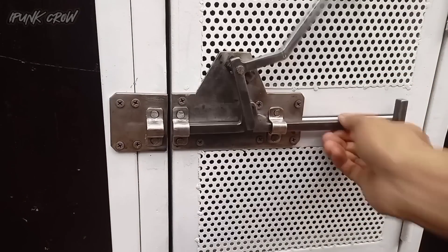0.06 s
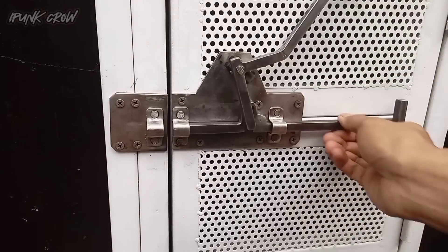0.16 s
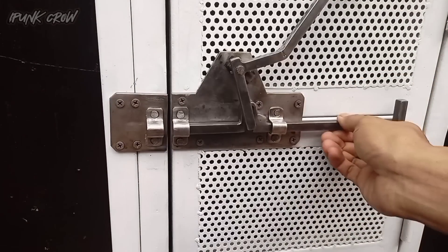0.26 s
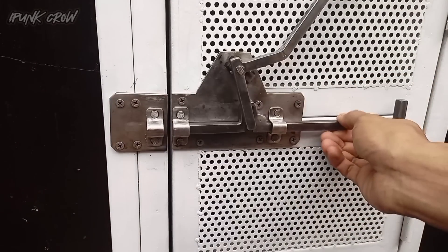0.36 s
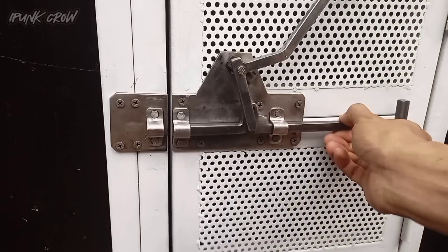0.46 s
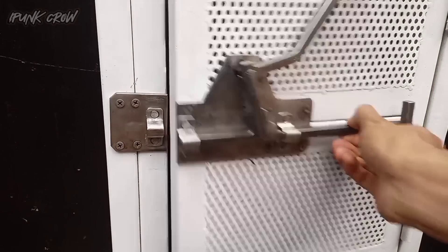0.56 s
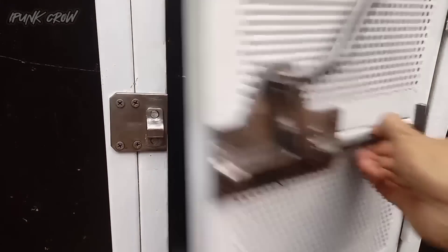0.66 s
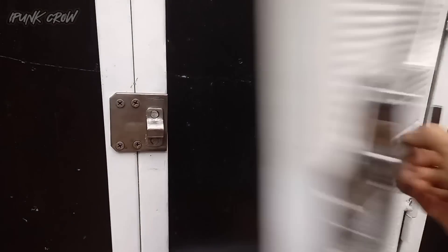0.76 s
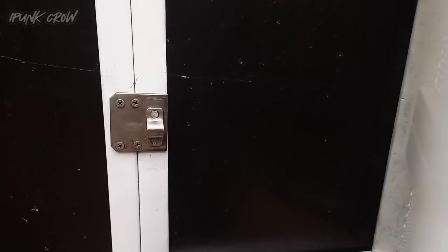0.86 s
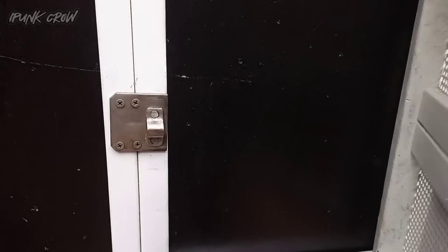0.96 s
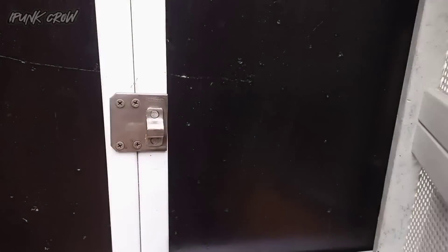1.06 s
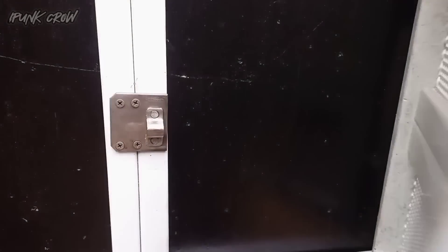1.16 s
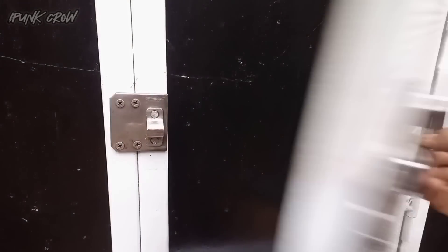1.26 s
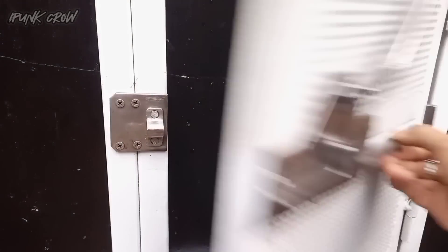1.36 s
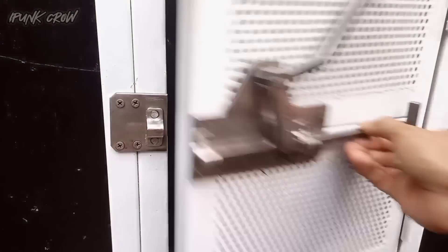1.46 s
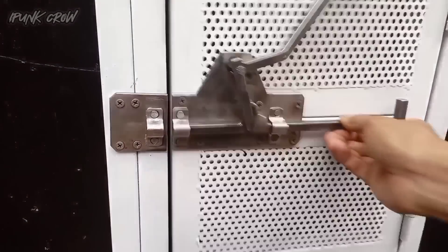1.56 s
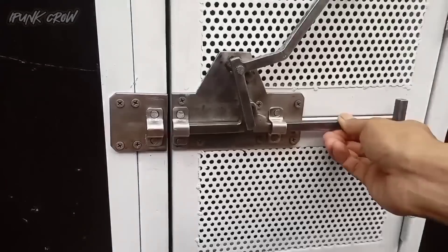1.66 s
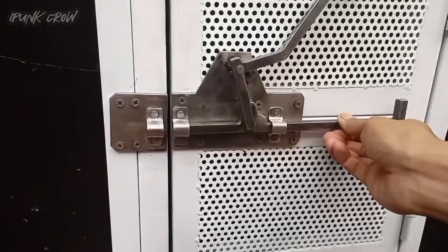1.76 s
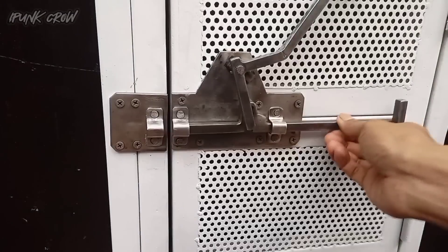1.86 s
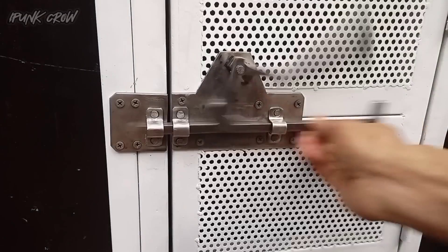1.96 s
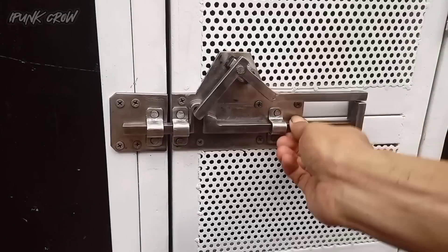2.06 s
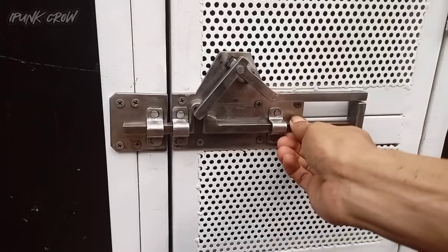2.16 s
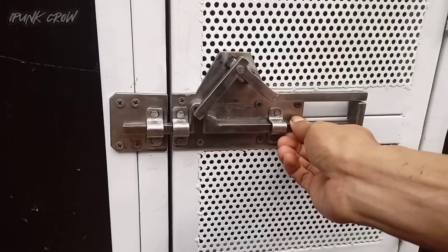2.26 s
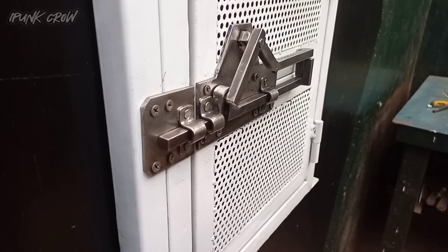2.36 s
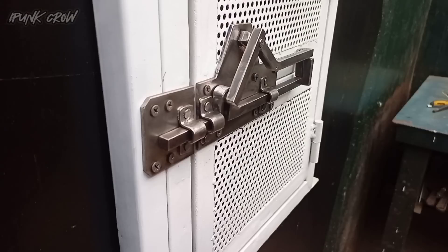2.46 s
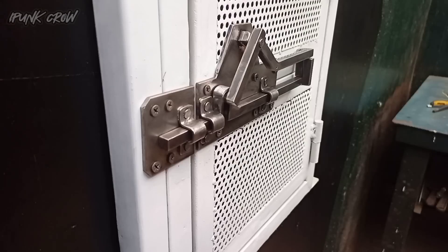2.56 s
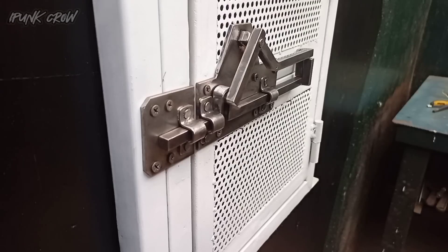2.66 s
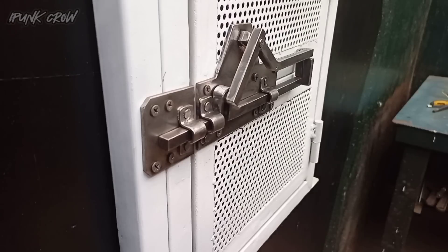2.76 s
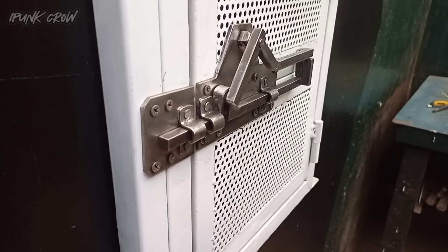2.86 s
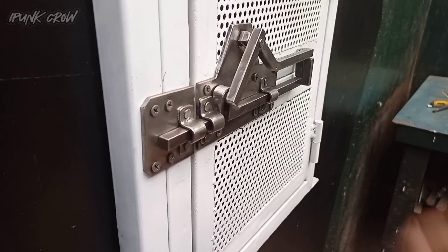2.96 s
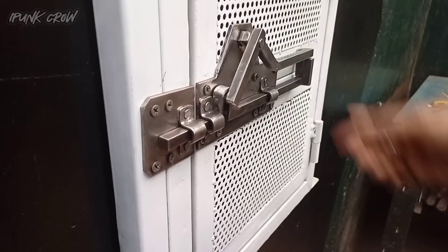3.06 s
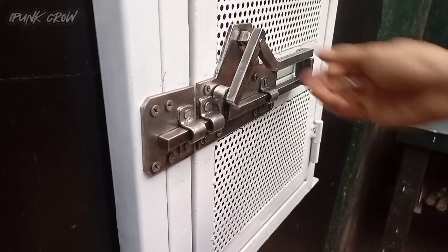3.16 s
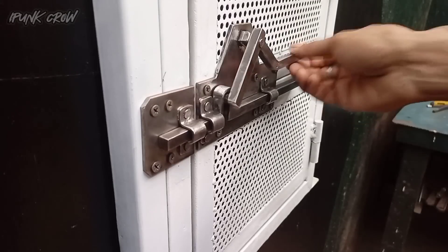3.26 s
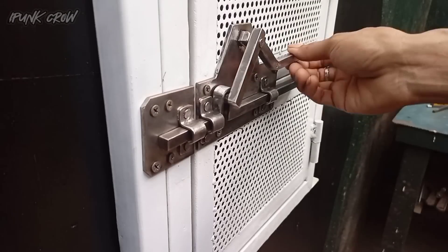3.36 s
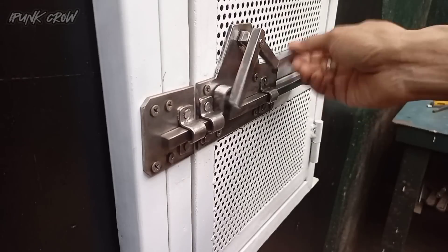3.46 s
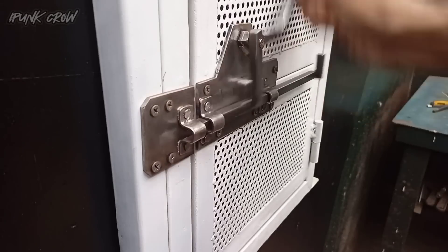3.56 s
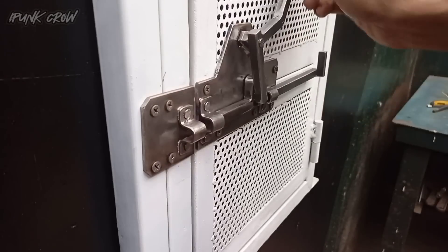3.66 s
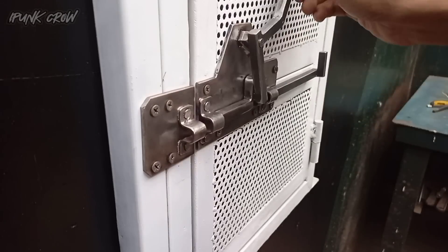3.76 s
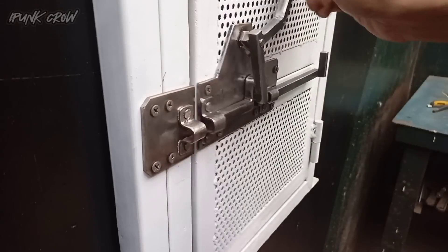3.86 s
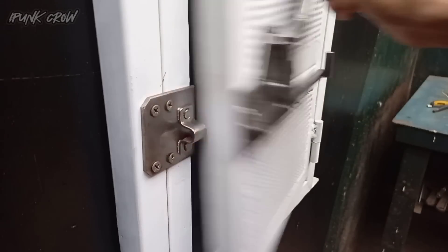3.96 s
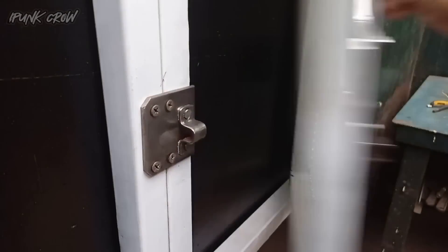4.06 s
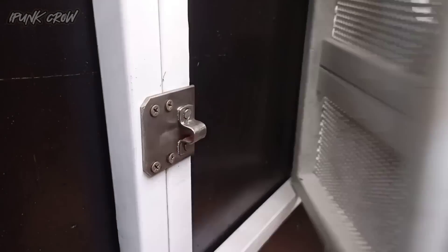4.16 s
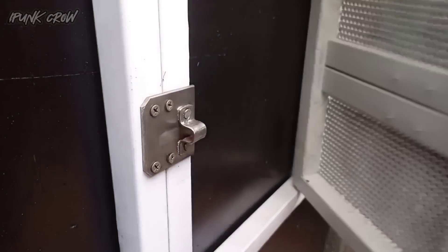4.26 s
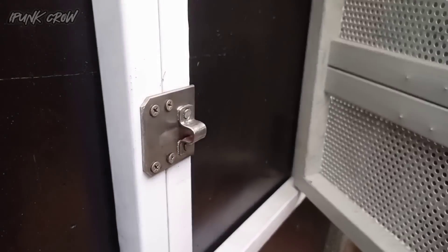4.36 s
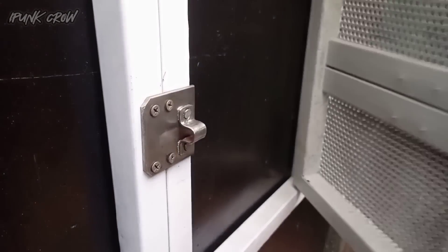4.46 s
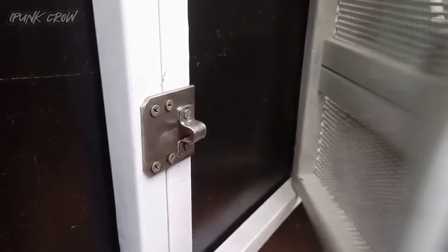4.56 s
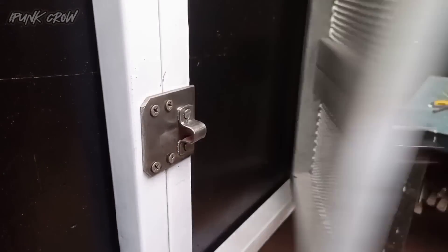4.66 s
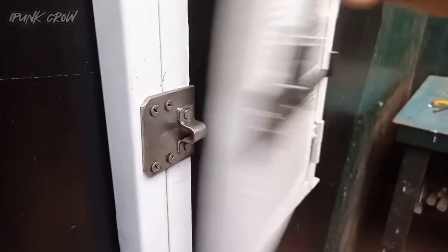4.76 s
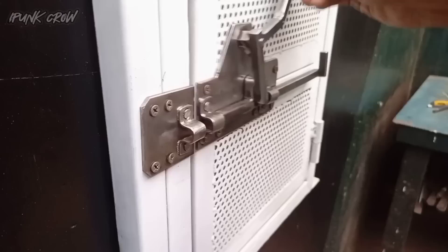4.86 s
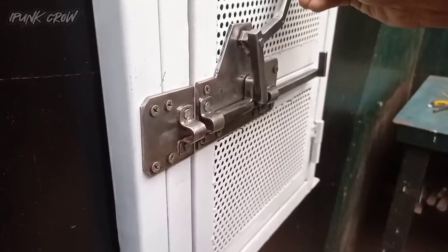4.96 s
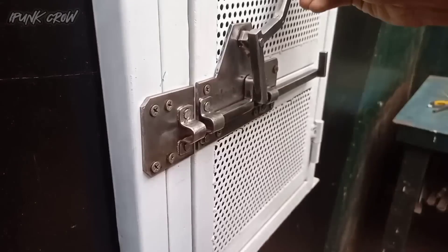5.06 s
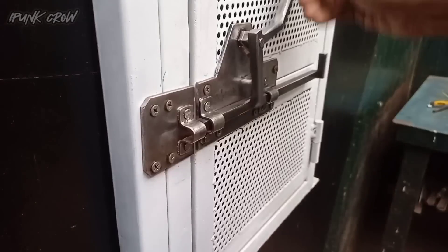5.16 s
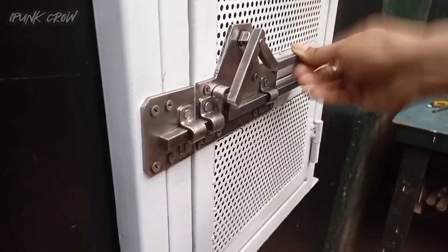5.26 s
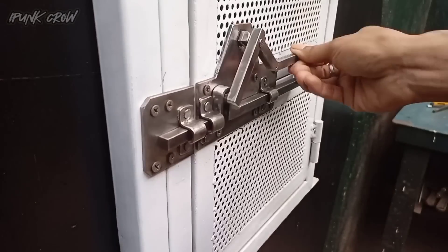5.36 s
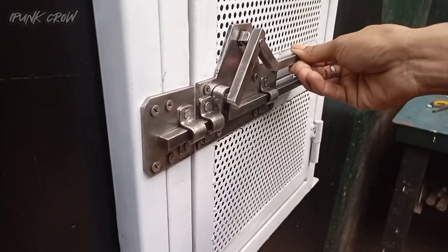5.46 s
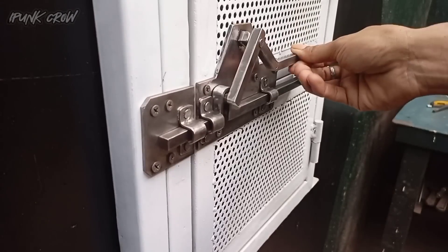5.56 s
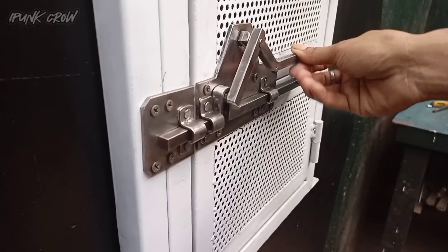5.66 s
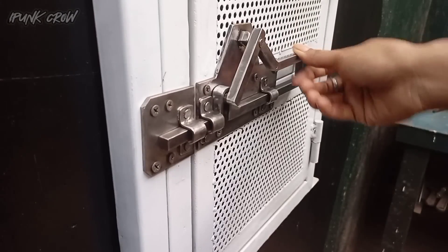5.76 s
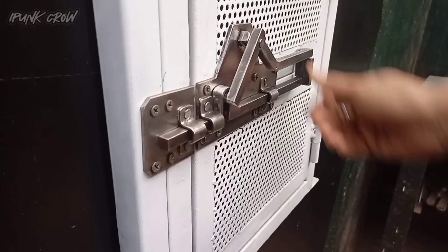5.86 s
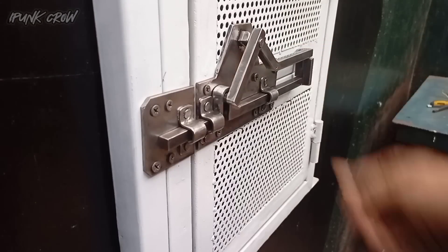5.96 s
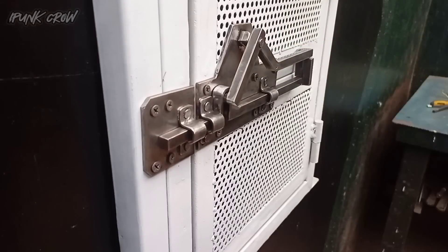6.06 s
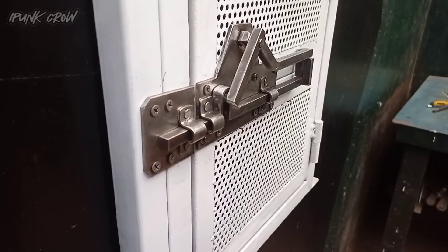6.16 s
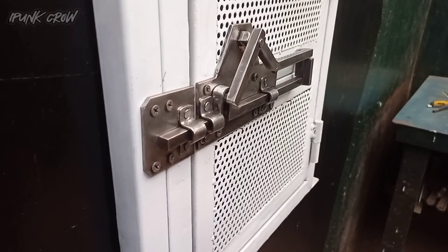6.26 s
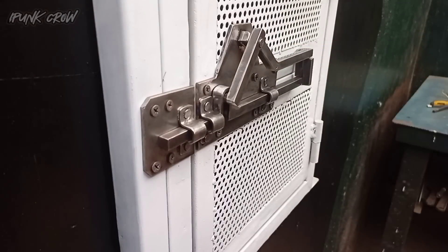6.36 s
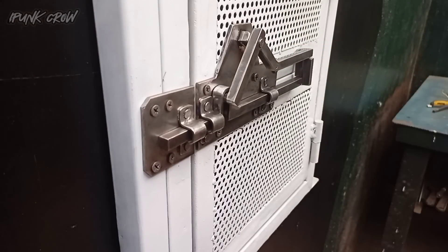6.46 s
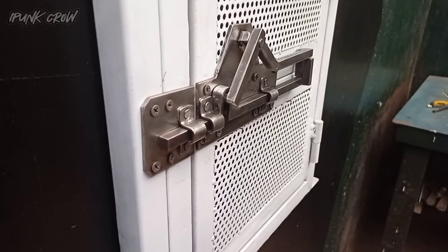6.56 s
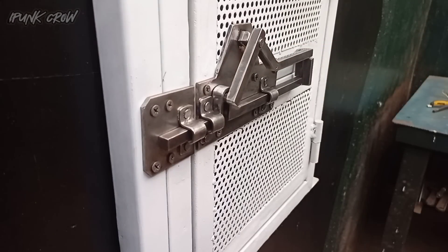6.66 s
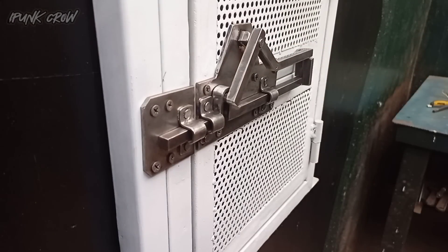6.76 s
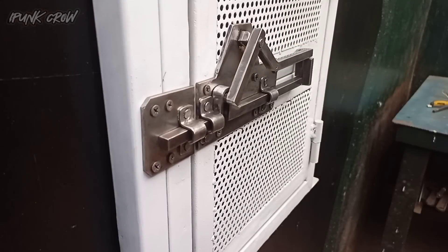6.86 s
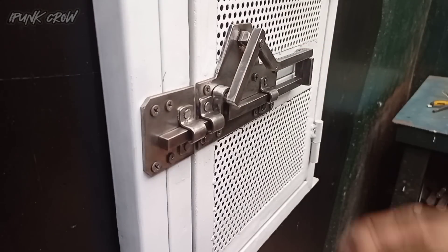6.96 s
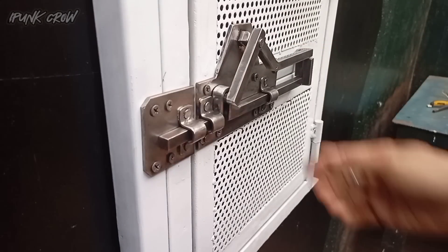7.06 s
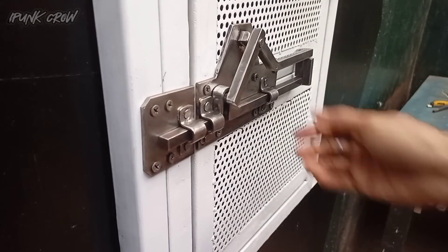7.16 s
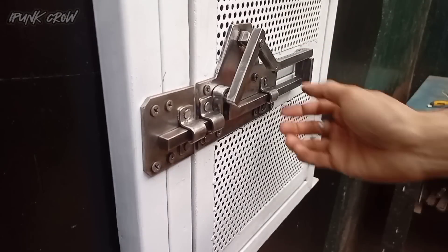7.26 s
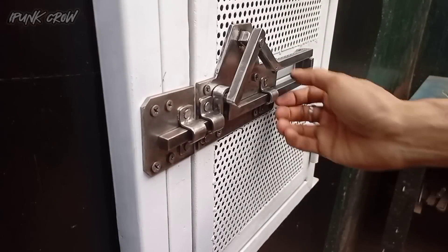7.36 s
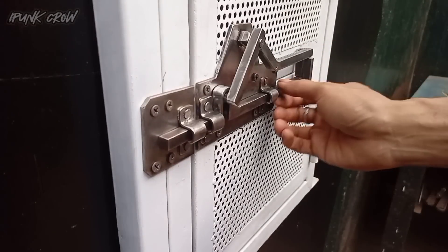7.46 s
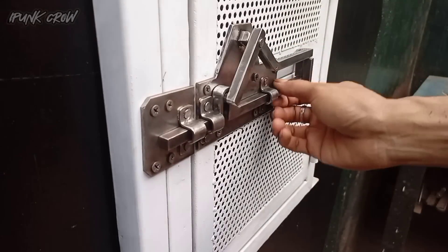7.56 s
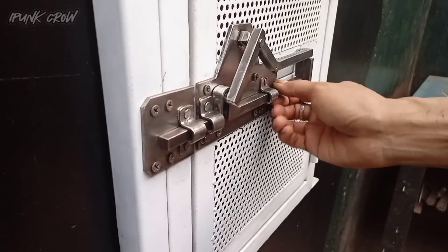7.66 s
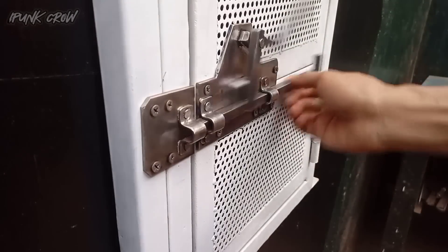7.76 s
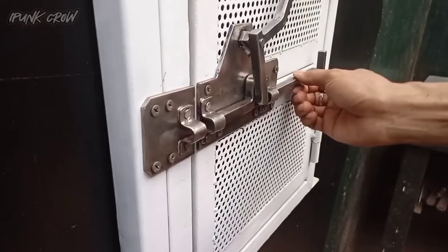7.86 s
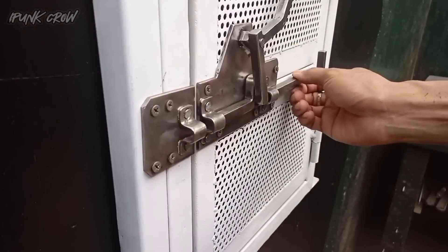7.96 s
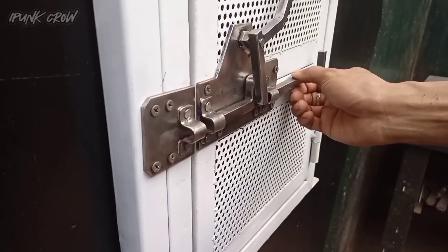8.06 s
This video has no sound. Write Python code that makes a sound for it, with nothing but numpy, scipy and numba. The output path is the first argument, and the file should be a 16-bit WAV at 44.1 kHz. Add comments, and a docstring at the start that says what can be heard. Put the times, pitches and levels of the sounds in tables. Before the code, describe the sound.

A steel lever bolt clacks, scrapes and bangs five times on a sheet-metal door that shuts twice, over a faint hum.

```python
"""In a small hard room, a hand works a steel lever bolt on a perforated sheet-metal door, five throws in all.
Each throw is a clack of loose links, a stick-slip scrape and a bang on the end stop; the impacts excite
the modes of latch and sheet. Twice the door meets its frame, and its hinges knock and chirp as it swings.
A faint hum lies underneath. A limiter ducks on the bangs, so that the room swells after them."""
import sys
import numpy as np
from scipy import signal
from scipy.fft import rfft, irfft
from scipy.io import wavfile
from numba import njit

SR = 44100
rng = np.random.default_rng(int(sys.argv[2]) if len(sys.argv) > 2 else 0)


def materialize(psi):
    """Save the field psi as 16-bit PCM at rate SR to the path in sys.argv[1].

    A 1-D psi becomes a single channel; in a 2-D psi each row is a channel.
    """
    bounded = np.clip(np.atleast_2d(psi).T, -1, 1)
    quanta = np.round(bounded * 32767).astype(np.int16)
    wavfile.write(sys.argv[1], SR, quanta)


N = 357210
T = np.arange(N) / SR
RING_T = T[:SR]  # one second for a blow to die away

# steady machine tones: (frequency [Hz], level [dB])
HUM_TONES = [(102.3, -88), (339.1, -76.5), (393.0, -71), (452.2, -76.5), (877.5, -83.5), (952.8, -78.5),
             (1017, -80), (1513, -73), (1637, -85.5), (1793, -81.5)]
# spectra of the background noises: (frequency [Hz], relative spectral level [dB])
AIR_SPECTRUM = [(25, -31.5), (100, -9.5), (190, -5), (260, -3.5), (400, 3), (560, -5.5), (930, 2),
                (1380, -17), (1540, 3), (1800, -7), (2400, -31.5), (7500, -50)]
HISS_SPECTRUM = [(1500, -22.5), (2200, -2.5), (2500, -8.5), (3100, 1), (4300, 2.5), (5200, -6), (6500, -7),
                 (8000, -18)]
RUMBLE_SPECTRUM = [(25, -29), (60, 5.5), (115, -1.5), (200, -13), (600, -44.5)]
# swells of the hiss and of the rumble: (centre [s], half width [s], level [dB])
HISS_SWELLS = [(4.95, 0.17, -73), (6.08, 0.13, -77), (6.88, 0.058, -75.5)]
RUMBLE_SWELLS = [(0.65, 0.27, -64), (1.35, 0.2, -63.5), (2.1, 0.34, -64), (6.4, 0.16, -68),
                 (7.45, 0.46, -71.5)]
# spectra of wall echoes, steel impact, friction, door boom: (frequency [Hz], relative spectral level [dB])
WALL_SPECTRUM = [(60, -2), (300, 5), (800, -7), (1600, -2), (3000, -1.5), (4500, 0.5), (6500, 0), (8400, 1)]
STEEL_SPECTRUM = [(60, -38), (200, -25), (400, -20), (700, -9.5), (1200, -9), (1700, -2.5), (2300, -0.5),
                  (3500, -2), (4800, -3), (6700, -0.5), (7600, -6.5), (8400, -13)]
SCRAPE_SPECTRUM = [(60, -33.5), (300, -28), (1000, -14.5), (1700, 3), (2200, 0), (3500, 3), (4800, -9.5),
                   (6700, -8), (8400, -21.5)]
BOOM_SPECTRUM = [(30, -31), (70, -16), (150, 2.5), (400, -1), (800, -1), (1500, -10), (4000, -31.5)]
# modes of the latch's lever, guides and plate: (frequency [Hz], relative level [dB])
LATCH_RING = [(1141, -6.5), (1636, -7.5), (1754, -7.5), (1868, 4.5), (1954, -2), (2045, -3.5), (2126, 1.5),
              (2217, 2), (2314, -1.5), (2535, -8.5), (2777, -1.5), (3025, -3), (3294, -5.5), (3429, 0),
              (3590, -2), (3800, -6), (3892, -5.5), (3983, -3), (4242, -3.5), (4441, -3), (4635, -7.5),
              (5431, -5), (5544, -6.5), (5883, -13), (5996, -6.5), (6115, -5.5), (6212, -1), (6508, -2),
              (6669, -5.5), (6896, -10)]
# modes of the bolt, damped by the hand: (frequency [Hz], relative level [dB])
BOLT_RING = [(1960, -2), (2150, -2), (2830, -5), (3235, 1), (3440, -2), (3650, 1.5), (3914, -3.5),
             (4250, -8.5)]
# modes of the sheet-metal door: (frequency [Hz], relative level [dB])
PANEL_RING = [(78, -12.5), (112, -17.5), (135, -10), (161, -4.5), (186, -3.5), (228, -1), (268, -6),
              (310, 4), (345, -0.5), (395, 3.5), (432, 4.5), (492, -10.5), (565, -5.5)]
# damped low tones of the thump that comes with each bang: (frequency [Hz], relative level [dB])
THUMP_TONES = [(75, -8), (135, 3), (215, -3), (340, -1.5), (490, 5.5), (660, 6.5), (880, 0)]
# slips of the hinge as the door starts to swing: (time [s], level [dB], pitch [Hz])
HINGE_SLIPS = [(4.046, -29, 2244), (4.063, -36.5, 2250), (4.111, -35.5, 2230)]
# knocks of the swinging door on its hinges: (time [s], level [dB], treble [dB], body [dB])
HINGE_HITS = [(0.9954, -25, -6, 5), (1.4607, -51, -17.5, 9.5), (4.128, -20.5, -5.5, -7),
              (4.4127, -36, -10, 6)]
# knocks of the loose links and lever: (time [s], level [dB], treble [dB], body [dB])
LINK_HITS = [(0.0004, -43.5, -7.5, -4), (0.168, -17.5, -10, -9), (0.1939, -26.5, -9, -13),
             (0.2642, -21.5, -9.5, -7), (0.6183, -44.5, -7, -6), (1.8101, -21.5, -8, -19.5),
             (2.0933, -25, -5, -3), (2.1162, -26.5, -10, 1.5), (2.1455, -21.5, -11.5, -5.5),
             (2.1544, -24, -1, -5), (3.4594, -51.5, -18.5, -1), (3.683, -23.5, -15.5, -6),
             (3.769, -19, -7, -16), (3.7897, -19, -13.5, -22), (5.0781, -13.5, -5, -5.5),
             (5.3447, -34, -7.5, -12.5), (5.373, -32, -3, -7), (5.389, -24, -1, -11),
             (5.4265, -17.5, -17, -15), (5.453, -18.5, -19.5, -12.5), (7.6277, -33, -22, 0.5),
             (7.7251, -42, -20, 1), (7.9285, -20, -7.5, -18)]
# the door meets its frame: (time [s], level [dB], treble [dB], panel level [dB])
FRAME_HITS = [(1.775, -16.5, -4.5, -34.5), (5.052, -7, -5.5, -32.5)]
# throws of the bolt: (start [s], jolt level [dB], scrape level [dB], scrape growth [dB],
# scrape treble [dB], stop [s], bang level [dB], thump level [dB])
BOLT_THROWS = [(0.168, -26, -29.5, -8.5, 1.5, 0.274, -5.5, -10),
               (2.150, -28.5, -24, 1.5, 7.5, 2.210, -1.5, -4.5),
               (3.684, -20.5, -46.5, 20, -0.5, 3.828, -6, -10), (5.427, -5, -27, -7, -1.5, 5.486, -4, -3.5),
               (7.93, -15, -35, 5, 0.5, 8.0235, 3, 2)]


def undb(db):
    """Decibels to amplitude ratio."""
    return 10 ** (np.asarray(db) / 20)


def unit(x):
    """Normalisation to rms 1."""
    return x / np.sqrt(np.mean(x ** 2))


def fade(t60):
    """Exponential decay, 60 dB down after t60 seconds."""
    return np.exp(-np.log(1000) * RING_T / t60)


def add(track, s, sound):
    """Superposition: a sound joins the track at time s."""
    start = max(int(s * SR), 0)
    track[start:start + len(sound)] += sound[:N - start]


def walk(rate_hz):
    """Slow random modulation with a spread near 1."""
    knots = np.arange(0, T[-1] + 1, 1 / rate_hz)
    return np.interp(T, knots, rng.standard_normal(len(knots)))


def swells(rows, steady_db):
    """Power addition of a steady level and bell-shaped swells."""
    power = sum((undb(db) * np.exp(-.5 * ((T - s) / width_s) ** 2)) ** 2 for s, width_s, db in rows)
    return np.sqrt(undb(steady_db) ** 2 + power)


def noise(spectrum, size, ripple_db=0, ripple_hz=100):
    """Spectrally shaped noise of rms 1; overlapping resonances bunch into random ripples."""
    hz, db = np.transpose(spectrum)
    f = np.maximum(np.fft.rfftfreq(size, 1 / SR), 1)
    ripples = np.interp(f / ripple_hz, np.arange(512), rng.standard_normal(512))
    shape = undb(np.interp(np.log(f), np.log(hz), db) + ripple_db * ripples)
    return unit(irfft(rfft(rng.standard_normal(size)) * shape, size))


def shelf(x, hz, db, kind):
    """Minimum-phase shelf: raises or lowers everything above ("high") or below ("low") a frequency."""
    edge = 1 / (1 + (np.fft.rfftfreq(len(x), 1 / SR) / hz) ** 8)
    cepstrum = irfft(np.log(undb(db)) * (edge if kind == "low" else 1 - edge), len(x))
    cepstrum[1:len(x) // 2] *= 2
    cepstrum[len(x) // 2 + 1:] = 0  # causal: nothing sounds before the blow
    return irfft(rfft(x) * np.exp(rfft(cepstrum)), len(x))


def ring(modes, t60, slope, scatter_db, detune):
    """Free vibration of randomly weighted modes: the lowest dies in t60 seconds, higher ones sooner."""
    hz, db = np.transpose(modes)[:, :, None]
    size, sign, shift = rng.standard_normal((len(modes), 3)).T[:, :, None]
    gain = undb(db + scatter_db * size) * np.sign(sign)
    waves = np.sin(2 * np.pi * hz * (1 + detune * shift) * RING_T, dtype=np.float32)
    decay = np.exp(-np.log(1000) * RING_T / t60 * (hz / hz[0]) ** slope, dtype=np.float32)
    return np.sum(gain * waves * decay, axis=0) / np.sqrt(np.sum(gain ** 2))


def background():
    """Ambient noise: a faint wavering hum over room air; a thin hiss and low rumble swell now and then."""
    tones = np.zeros(N)
    for hz, db in HUM_TONES:
        amplitude = np.sqrt(2) * undb(db + 2 * walk(5.6))
        tones += amplitude * np.sin(2 * np.pi * np.cumsum(hz + 2.5 * walk(16)) / SR)
    air = undb(-66.5 + .7 * walk(4)) * noise(AIR_SPECTRUM, N)
    hiss = unit(sum(noise(HISS_SPECTRUM, N, ripple_db=4.5, ripple_hz=80) * undb(3.5 * walk(9))
                    for _ in range(6)))
    hiss *= swells(HISS_SWELLS, steady_db=-79.5)
    rumble = noise(RUMBLE_SPECTRUM, N) * undb(1.8 * walk(3.7))
    rumble *= swells(RUMBLE_SWELLS, steady_db=-80)
    return tones + air + hiss + rumble


def room(x, wet_db, t60, treble_t60):
    """Reverberation: dense reflections from near hard walls, the treble dying a little sooner."""
    lowpass = signal.butter(2, 4500, fs=SR, output="sos")
    highpass = signal.butter(2, 4500, "high", fs=SR, output="sos")
    wet = np.zeros(N)
    for start in range(0, N, SR):  # door and arm move: a new echo pattern each second
        echoes = noise(WALL_SPECTRUM, SR)
        lows = signal.sosfilt(lowpass, echoes) * fade(t60)
        highs = signal.sosfilt(highpass, echoes) * fade(treble_t60)
        tail = (lows - highs) * (1 - fade(0.017))
        tail /= np.sqrt(np.sum(tail ** 2))
        add(wet, start / SR, signal.fftconvolve(x[start:start + SR], tail))
    return x + undb(wet_db) * wet


def hinge_chirps():
    """Friction-excited vibration: each brief slip of the hinge sings one rough note."""
    out = np.zeros(N)
    sag = 1 + 0.025 * (2 * fade(0.018) - 1)  # the pitch falls as the slip slows
    for s, db, hz in HINGE_SLIPS:
        note = np.sin(2 * np.pi * np.cumsum(hz * sag) / SR) + undb(-5) * noise(SCRAPE_SPECTRUM, SR)
        add(out, s, undb(db) * note * (1 - fade(0.0093)) * fade(0.032))
    return out


def steel_impact(rise_s, chatter_s, crack_t60, jangle_db, jangle_t60, modes_db, modes_t60):
    """Impact excitation: steel faces chatter, then crowded modes jangle and the latch rings down."""
    chatter = np.minimum(fade(crack_t60) * undb(60 * chatter_s / crack_t60), 1)  # holds, then decays
    crack = noise(STEEL_SPECTRUM, SR, ripple_db=3.5, ripple_hz=222.1) * chatter
    jangle = noise(STEEL_SPECTRUM, SR) * undb(jangle_db) * fade(jangle_t60)
    tones = undb(modes_db) * ring(LATCH_RING, modes_t60, slope=0.16, scatter_db=0, detune=0.00036)
    return (crack + jangle + tones) * (1 - np.exp(-RING_T / rise_s))


def hinge_knocks():
    """Impulsive contact: with no rubbing after it, a hinge knock is one short tick."""
    out = np.zeros(N)
    for s, db, treble_db, body_db in HINGE_HITS:
        tick = steel_impact(rise_s=0.0017, chatter_s=0.0016, crack_t60=0.033,
                            jangle_db=-16.5, jangle_t60=0.17, modes_db=-6, modes_t60=0.08)
        tick = shelf(tick, 5200, treble_db, "high")
        add(out, s, undb(db) * shelf(tick, 1150, body_db, "low"))
    return out


def link_clacks():
    """Backlash: loose links take up their play; hard knocks chatter longer, gentle ones start softly."""
    out = np.zeros(N)
    gentle_db = -36
    for s, db, treble_db, body_db in LINK_HITS:
        rise_s = 0.0021 * undb(.5 * max(gentle_db - db, 0))
        chatter_s = 0.0022 * undb(0.12 * (db - gentle_db))
        clack = steel_impact(rise_s, chatter_s, crack_t60=0.1,
                             jangle_db=-17.5, jangle_t60=0.18, modes_db=-8.5, modes_t60=0.089)
        clack = shelf(clack, 4800, treble_db, "high")
        add(out, s, undb(db) * shelf(clack, 840, body_db, "low"))
    return out


def door_shuts():
    """Plate vibration: the door lands on its frame, so the sheet booms and the latch jangles."""
    out = np.zeros(N)
    for s, db, treble_db, panel_db in FRAME_HITS:
        blow = steel_impact(rise_s=0.0049, chatter_s=0.0084, crack_t60=0.083,
                            jangle_db=-5.5, jangle_t60=0.18, modes_db=-13.5, modes_t60=.13)
        add(out, s, undb(db) * shelf(blow, 4400, treble_db, "high"))
        panel = ring(PANEL_RING, t60=1.9, slope=0.99, scatter_db=1, detune=0.006)
        boom = noise(BOOM_SPECTRUM, SR) * fade(0.44)
        add(out, s, undb(panel_db) * (panel + boom))
    return out


def bolt_jolts():
    """Damped free vibration: the lever jerks the bolt into motion and the hand deadens its ring."""
    out = np.zeros(N)
    for start, db, *_ in BOLT_THROWS:
        jolt = ring(BOLT_RING, t60=0.05, slope=0.15, scatter_db=3.5, detune=0.014) * (1 - fade(0.0085))
        add(out, start, undb(db) * jolt)
    return out


def bolt_scrapes():
    """Stick-slip friction: dense uneven contacts, each a puff of grit that also rings the latch."""
    out = np.zeros(N)
    contacts_per_s, coast_s = 1100, 0.0098  # the bolt coasts free just before the stop
    for start, _, db, growth_db, treble_db, stop, *_ in BOLT_THROWS:
        travel = RING_T / (stop - coast_s - start)
        pressure = undb(db + growth_db * np.minimum(travel, 1)) * (travel < 1)
        touches = rng.random(SR) < contacts_per_s / SR
        contacts = touches * undb(6.7 * rng.standard_normal(SR)) * rng.choice([-1, 1], SR)
        grit_power = np.abs(signal.fftconvolve(contacts ** 2, fade(0.0087) ** 2)[:SR])
        grit = noise(SCRAPE_SPECTRUM, SR) * np.sqrt(grit_power)
        latch = ring(LATCH_RING, t60=0.045, slope=.4, scatter_db=-1.5, detune=.001)
        singing = signal.fftconvolve(contacts, latch)[:SR]
        scrape = unit(grit) + undb(-5) * unit(singing)
        add(out, start, pressure * shelf(scrape, 4800, treble_db, "high"))
    return out


def bolt_stops():
    """Impact: the bolt halts with a hard bang; a short, dull low thump comes with each bang."""
    bangs, thumps = np.zeros(N), np.zeros(N)
    for *_, stop, bang_db, thump_db in BOLT_THROWS:
        bang = steel_impact(rise_s=0.0022, chatter_s=0.0047, crack_t60=0.032,
                            jangle_db=-17.5, jangle_t60=0.34, modes_db=-16, modes_t60=0.31)
        bang = shelf(bang, 6400, -3.5, "high")
        panel = ring(PANEL_RING, t60=0.55, slope=0.71, scatter_db=8.5, detune=0.012)
        add(bangs, stop, undb(bang_db) * (bang + undb(-32) * panel))
        thump = ring(THUMP_TONES, t60=.045, slope=.4, scatter_db=1, detune=.05) * (1 - fade(.008))
        add(thumps, stop + .002, undb(thump_db) * thump)
    return bangs, thumps


def scene():
    """Superposition of the reverberant latch and door, the dry thumps and the background."""
    bangs, thumps = bolt_stops()
    direct = (bangs + link_clacks() + hinge_knocks() + bolt_jolts() + bolt_scrapes()
              + hinge_chirps() + door_shuts())
    reverberant = room(direct, wet_db=-7, t60=0.44, treble_t60=0.32)
    return (reverberant + thumps + background())[None]


@njit
def envelope(x, attack, release):
    """Envelope detection: the rectified sound is smoothed at one rate rising, another falling."""
    out, level = np.empty(len(x)), 0.
    for i in range(len(x)):
        size = abs(x[i])
        level += (size - level) * (attack if size > level else release)
        out[i] = level
    return out


def limiter(x, ceiling_db, attack_s, release_s):
    """Gain reduction while the envelope, read a millisecond ahead, stands above the ceiling."""
    size = envelope(x, 1 / (attack_s * SR), 1 / (release_s * SR))
    ahead = np.interp(T + .001, T, size)
    return x / np.maximum(ahead / undb(ceiling_db), 1)


def record(dry):
    """Limiting, soft saturation of the peaks, then band limiting: a bass cut and a steep top."""
    held = limiter(dry[0], ceiling_db=-14.5, attack_s=0.00098, release_s=.06)
    peak = undb(-5.5)
    rounded = peak * np.tanh(held / peak)
    bass_cut = signal.sosfilt(signal.butter(4, 52, "high", fs=SR, output="sos"), rounded)
    treble_cut = signal.sosfilt(signal.butter(12, 7800, fs=SR, output="sos"), bass_cut)
    return signal.sosfilt(signal.cheby1(10, .2, 8000, fs=SR, output="sos"), treble_cut)[None]


dry = scene()
out = record(dry)
materialize(out)
```